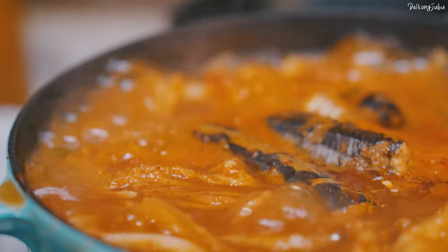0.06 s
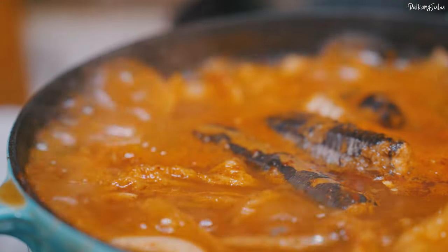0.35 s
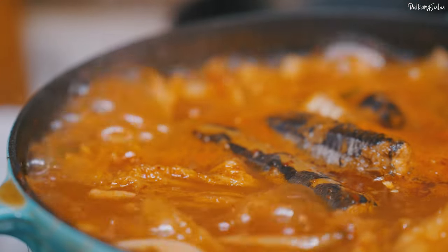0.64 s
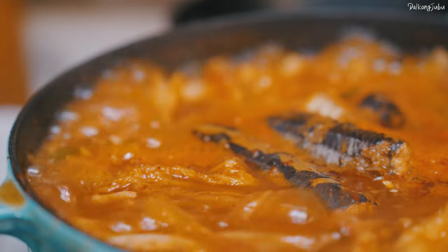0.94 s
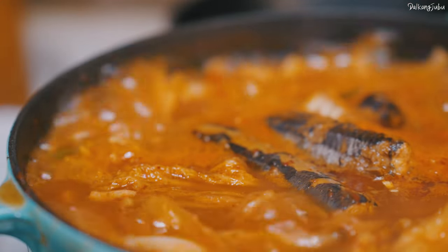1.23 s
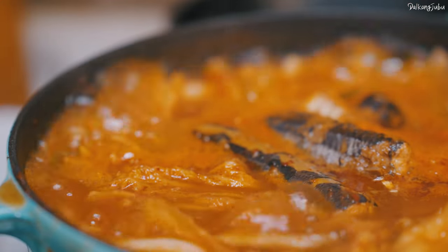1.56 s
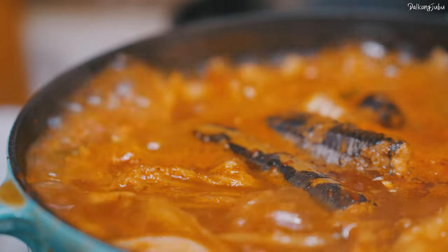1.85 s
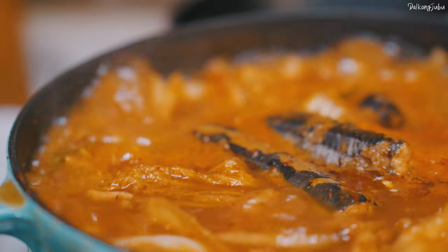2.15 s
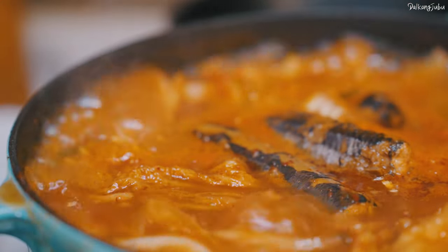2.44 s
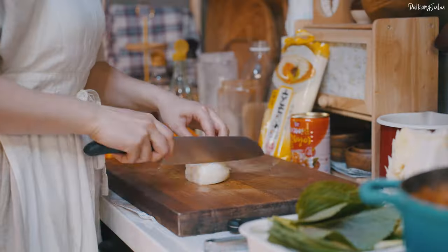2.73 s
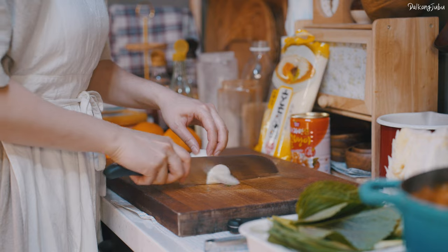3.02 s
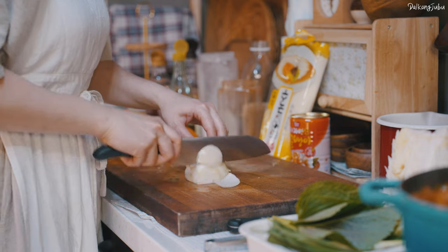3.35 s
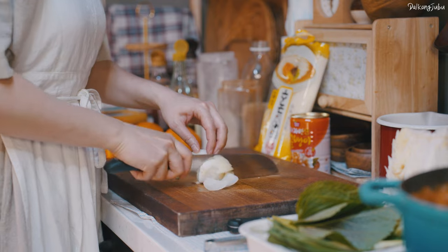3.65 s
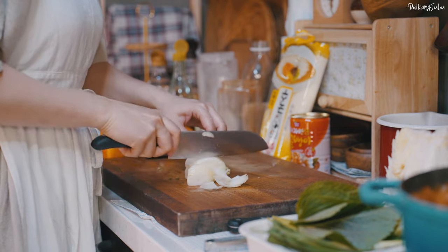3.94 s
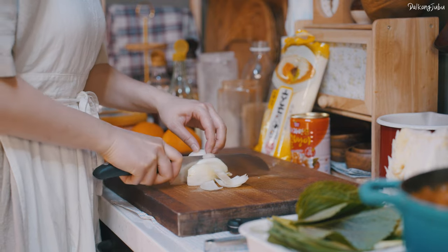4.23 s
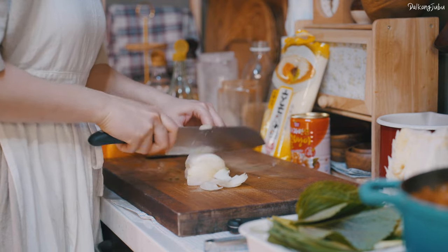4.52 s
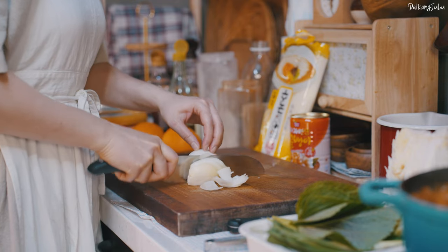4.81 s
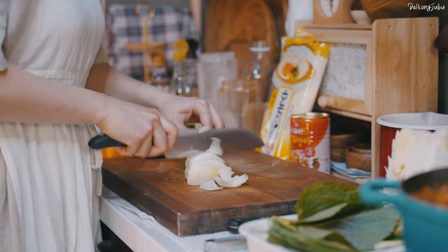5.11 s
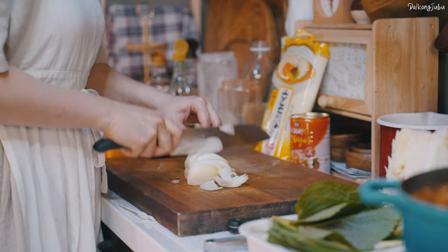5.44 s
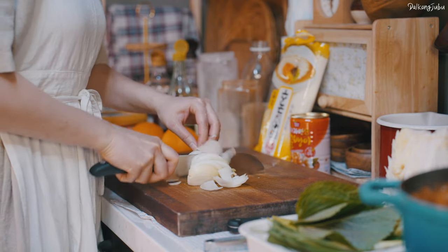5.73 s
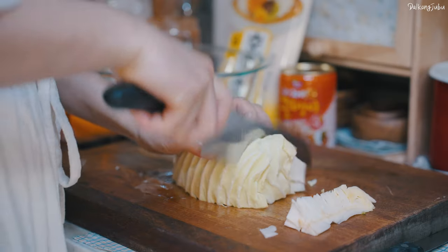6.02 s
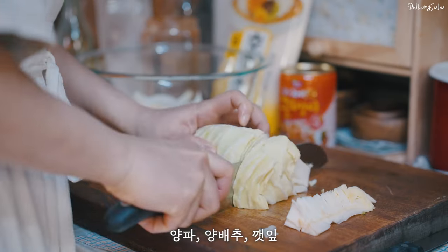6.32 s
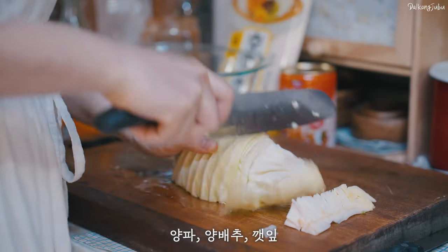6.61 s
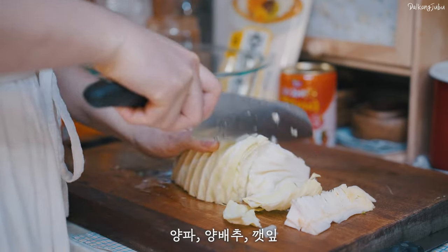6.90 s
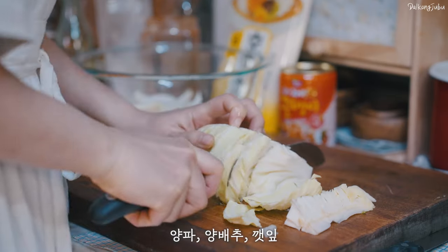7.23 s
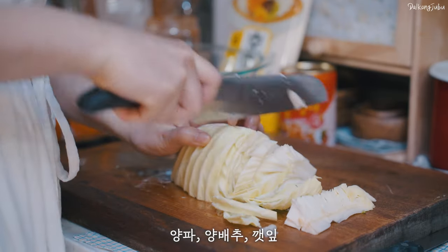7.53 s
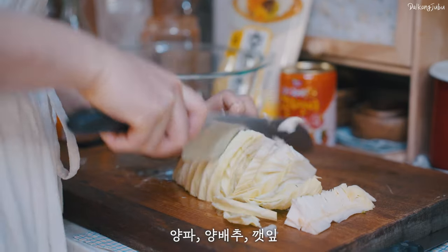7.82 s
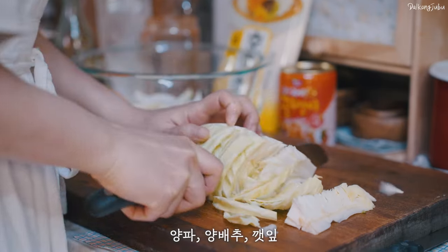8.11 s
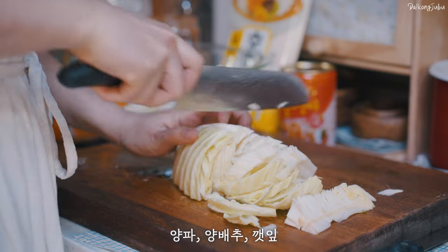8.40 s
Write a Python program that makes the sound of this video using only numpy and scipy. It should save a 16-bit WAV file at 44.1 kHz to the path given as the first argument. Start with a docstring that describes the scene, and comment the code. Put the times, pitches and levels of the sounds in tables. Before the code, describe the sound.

Heard from just above the rim, a pot of stew bubbles and plops over a fine fizz. Then the microphone is beside a cutting board in a small, quiet kitchen: six evenly paced knife strokes hiss through an onion and knock on the wood. Three slower, coarser cuts through cabbage follow, with snapping ribs and cushioned thuds, while the stew keeps simmering faintly across the counter.

```python
"""A thick stew simmers in a small kitchen, the microphone just above the rim, its bubbles bursting.
Then we are beside the cutting board, the pot faint across the counter: a knife slices an onion in six
sharp chops and crunches through a cabbage in three slower strokes. Each stroke is a swarm of bursting
cells that ends in a knock on the wooden board; shelf and walls echo it. Mono."""
import sys
import numpy as np
from scipy import signal
from scipy.fft import rfft, irfft
from scipy.io import wavfile

SR = 44100
rng = np.random.default_rng(int(sys.argv[2]) if len(sys.argv) > 2 else 0)


def wav_out(sig):
    """Save sig, one row per channel (or a flat mono array), as 16-bit PCM at SR to the path in sys.argv[1]."""
    wavfile.write(sys.argv[1], SR, np.round(np.clip(np.atleast_2d(sig).T, -1, 1) * 32767).astype(np.int16))


N = 381906
TO_BOARD_S, TO_CABBAGE_S = 2.787, 5.874  # the microphone jumps from pot to board, then to the cabbage
# The blade meets the board. Each row: time in seconds, relative level in dB, contact low-pass in Hz,
# counter thud in dB, factor on the wood's ring time, blade ring in dB.
CHOPS = [(3.0341, -14, 1870, 0.5, 0.46, -48), (3.5901, -9.5, 1580, -3.5, 0.39, -48),
         (4.2409, -12, 2300, 3, 0.54, -48), (4.752, -6.5, 2540, 3, 0.44, -48),
         (5.275, -6, 2730, 0, 0.42, -48), (5.7662, -6, 3340, 0.5, 0.4, -48),
         (6.127, -18.5, 830, 1, 0.53, -24), (7.0638, -8.5, 960, 8, 0.53, -18.5),
         (7.9533, -10, 1000, 6.5, 0.37, -19.5)]


def undb(db):
    """Decibels to gain."""
    return 10 ** (np.asarray(db) / 20)


def unit(x):
    """Scale to rms 1."""
    return x / np.sqrt(np.mean(x ** 2))


def ticks(seconds):
    """Time axis in seconds."""
    return np.arange(int(seconds * SR)) / SR


def fade(t, t60):
    """Exponential decay, 60 dB down at t60."""
    return np.exp(-np.log(1000) * t / t60)


def swell(s, rise_s, fall_s):
    """Envelope that grows to 1 at time s and dies away after it."""
    t = np.arange(N) / SR - s
    return np.exp(np.maximum(np.minimum(t / rise_s, -t / fall_s), -40))


def add(track, s, sound):
    """Mix a sound in at time s."""
    i = max(int(s * SR), 0)
    track[i:i + len(sound)] += sound[:max(N - i, 0)]


def band(x, hz, kind, order=2):
    """Butterworth filter."""
    sections = signal.butter(order, np.clip(hz, 10, SR / 2 - 10), kind, fs=SR, output="sos")
    return signal.sosfilt(sections, x)


def colour(x, points, size=4096):
    """Causal filter shaped by (Hz, dB) points that keeps the power of white noise."""
    hz, db = np.transpose(points)
    gain = undb(np.interp(np.log(np.fft.rfftfreq(size, 1 / SR) + 1), np.log(hz), db))
    cepstrum = irfft(np.log(gain))[:size // 2]
    cepstrum[1:] *= 2  # minimum phase
    response = irfft(np.exp(rfft(cepstrum, size)))
    return signal.oaconvolve(x, response / np.linalg.norm(response))[:N]


def clicks(rate, spread_db):
    """Random clicks, about `rate` a second, many small and a few large; rms 1."""
    size = undb(spread_db * np.minimum(rng.exponential(size=N), 4))
    return unit((rng.random(N) < rate / SR) * size * rng.choice([-1, 1], N))


def room_tone():
    """The low, steady hush of the kitchen."""
    # Its spectrum. Each row: frequency in Hz, relative level in dB.
    spectrum = [(15, -9), (25, 3.5), (198, -5), (359, 5), (537, -4), (762, 2), (1140, -29), (1380, -6.5),
                (4870, -24), (12200, -42), (15500, -43)]
    return undb(-61) * colour(rng.standard_normal(N), spectrum)


def room(x, wet_db, echo_db, onset_s=0.0033):
    """The direct sound, two scattered echoes and a diffuse tail whose treble dies first."""
    # Echoes off shelf and walls. Each row: delay in seconds, relative level in dB.
    echoes = [(.019, -13.5), (.047, -17.5)]
    t, echo_t = ticks(0.54), ticks(0.02)
    low, high = rng.standard_normal((2, len(t)))
    tail = band(low, 4050, "low") * fade(t, t60=0.46) + band(high, 4300, "high") * fade(t, t60=0.3)
    tail *= np.clip(t / onset_s - 1, 0, 1)
    response = undb(wet_db) * tail / np.linalg.norm(tail)
    response[0] = 1
    for s, db in echoes:
        echo = rng.standard_normal(len(echo_t)) * fade(echo_t, t60=0.016)
        add(response, s, undb(db + echo_db) * echo / np.linalg.norm(echo))
    return signal.oaconvolve(x, response)[:N]


def bubbles(events, cycles, glide):
    """Each bursting film rings its small cavity for a few cycles, rising in pitch as it opens."""
    out, t = np.zeros(N), ticks(0.024)
    for (s, db, hz), chance in zip(events, rng.standard_normal(len(events))):
        age = hz * t / (cycles * np.exp(0.27 * chance))  # 1 when the ring is 60 dB down
        phase = 2 * np.pi * hz * t * (1 + glide * np.minimum(age, 1))
        attack = 1 - np.exp(-2 * hz * t)
        add(out, s, undb(db) * np.sin(phase) * fade(age, 1) * attack)
    return out


def simmer(rate, spread_db, cycles, fizz_db, heave=1):
    """A swarm of small bubbles, 200 to 3200 Hz, over the fine crackle of the froth; rms 1."""
    # The tone of the stew. Each row: frequency in Hz, relative level in dB.
    spectrum = [(35, -20), (60, -16), (107, 3.5), (152, -8), (226, -3.5), (272, -10), (351, -6),
                (559, -0.5), (657, -8.5), (976, -1.5), (1480, -3), (3580, -20.5), (8280, -33),
                (10400, -40.5), (15500, -41)]
    when, size, pitch = rng.random((int(rate * N / SR), 3)).T
    hz = 200 * (3200 / 200) ** pitch
    db = spread_db * np.minimum(-np.log(size), 2.5) + 14 * np.log10(hz / 1000)
    swarm = bubbles(np.c_[when * N / SR, db, hz], cycles, glide=0.19)
    froth = undb(fizz_db) * clicks(2500, 2.7) + undb(6) * band(clicks(3000, 5.2), 3050, "high")
    return unit(colour(unit(swarm) * heave + froth, spectrum))


def fizzes(events, spectrum, rate, rise_s):
    """Short puffs of fine wet crackle."""
    envelope, t = np.zeros(N), ticks(0.2)
    for s, db, length in events:
        add(envelope, s, undb(db) * np.minimum(t / rise_s, 1) * np.exp(-(t / length) ** 2))
    return colour(envelope * clicks(rate, spread_db=1.1), spectrum)


def bursts(events, cycles, glide, film_db, film_t60):
    """Big bubbles: the film tears with a wet tick and the cavity rings."""
    out, t = np.zeros(N), ticks(0.02)
    for s, db, hz in events:
        tear = rng.standard_normal(len(t)) * fade(t, film_t60)
        add(out, s, undb(db + film_db) * band(tear, [hz * 0.5, hz * 1.82], "band", order=3))
    return out + bubbles(events, cycles, glide)


def close_pot(lull_s=0.013, lull_db=-4, calm_db=-3, cluster_rise_s=0.002, cluster_fall_s=0.016):
    """Just above the rim: the stew hushes as each big bubble gathers, and small ones surge after it."""
    # Big bubbles. Each row: start in seconds, relative level in dB, pitch in Hz, surge after it in dB.
    pops = [(0.158, -36, 556, -1), (0.217, -27, 1340, -7), (0.28, -35, 560, 4), (0.375, -22.5, 880, -5),
            (0.394, -29, 1575, -2), (0.484, -27.5, 1450, -5), (0.542, -29.5, 1400, -8),
            (0.568, -28, 1210, -4), (0.622, -33.5, 780, 0), (0.67, -31, 899, -1), (0.725, -33, 557, -11),
            (0.747, -27, 800, -6.5), (0.839, -40, 1010, -7), (0.919, -35, 566, 2.5), (0.977, -29, 498, -8),
            (1.005, -30, 1020, -3), (1.035, -30, 1660, -15), (1.06, -34, 500, 3), (1.249, -25, 970, 0),
            (1.332, -29, 953, 0), (1.401, -38, 1330, 1.5), (1.496, -27, 1000, 6), (1.583, -31, 880, 1),
            (1.608, -35, 1460, -3), (1.72, -34, 493, 2), (1.742, -27, 1010, 4.5), (1.769, -35, 797, -9),
            (1.823, -24, 980, -2), (1.873, -28.5, 1190, 6), (1.94, -33, 573, 2), (1.995, -30.5, 1590, -8),
            (2.037, -32, 563, 2.5), (2.157, -31, 885, -8), (2.247, -28.5, 960, 4), (2.317, -26.5, 915, -2),
            (2.381, -31, 972, -1), (2.422, -37, 571, -2), (2.46, -31, 1250, -3), (2.518, -29.5, 1200, 3),
            (2.544, -32, 494, 1), (2.587, -32, 1070, 1.5), (2.702, -32, 1030, -6), (2.749, -30, 544, 0),
            (2.774, -32, 956, -2)]
    # Drops spitting on the hot rim. Each row: start in seconds, level in dB, length in seconds.
    spits = [(.056, -34.5, 0.011), (1.122, -52, 0.023), (1.143, -53, .012), (2.075, -46.5, 0.0055)]
    spit_spectrum = [(800, -39), (2800, 5), (5000, 1.5), (9000, -15), (15000, -36)]  # Hz, dB
    lulls, clusters, t = np.zeros(N), np.zeros(N), ticks(0.1)
    for s, _, _, db in pops:
        add(lulls, s - t[-1], np.exp(-t / lull_s)[::-1])
        add(clusters, s, undb(db) * np.minimum(t / cluster_rise_s, 1) * np.exp(-t / cluster_fall_s))
    heave = undb(lull_db * lulls) * (undb(calm_db) + clusters)
    pot = undb(-47) * simmer(rate=700, spread_db=4.5, cycles=6.2, fizz_db=-0.5, heave=heave)
    big_bubbles = bursts([pop[:3] for pop in pops], cycles=8.5, glide=0.1, film_db=-0.5, film_t60=0.0066)
    pot += undb(3.5) * big_bubbles
    pot += fizzes(spits, spit_spectrum, rate=2400, rise_s=0.0032)
    return room(pot, wet_db=-14, echo_db=-9)


def far_pot():
    """The stew from across the counter: a fainter simmer with more of the room in it."""
    # Big bubbles that carry to the board. Each row: start in seconds, relative level in dB, pitch in Hz.
    pops = [(3.22, -30, 825), (3.284, -42.5, 1140), (3.978, -36, 1310), (4.003, -34, 760),
            (5.897, -29, 1940), (6.418, -30, 1460), (6.529, -43, 1690), (6.854, -34, 1510),
            (7.407, -40, 1430), (7.426, -33, 1420), (8.18, -24, 1940), (8.354, -33, 1470),
            (8.44, -34, 2460), (8.48, -29, 1530), (8.602, -30.5, 1780)]
    pot = undb(-61) * simmer(rate=290, spread_db=3.5, cycles=4.5, fizz_db=-3)
    pot += undb(6) * bursts(pops, cycles=5.4, glide=0.064, film_db=-9, film_t60=0.024)
    return room(pot, wet_db=-9, echo_db=-7)


def handling(slices_db=-71, shreds_db=-69):
    """Loose onion slices, later cabbage shreds, crackle softly as they shift under the hand."""
    # Blade and fingers brush the pieces. Each row: start in seconds, level in dB, length in seconds.
    brushes = [(2.815, -60, .03), (3.218, -57, 0.011), (3.312, -52.5, 0.015), (3.378, -59, .04),
               (3.726, -57, .008), (3.942, -61, 0.041), (4.0, -51.5, 0.031), (4.103, -52, 0.023),
               (4.127, -44, 0.026), (4.572, -54.5, 0.015), (4.618, -44, 0.021), (5.005, -56.5, 0.017),
               (5.099, -46.5, 0.021), (5.177, -47.5, 0.025), (5.615, -43, 0.016), (5.911, -47.5, 0.013),
               (6.462, -49, 0.0058), (6.503, -56, 0.011), (6.808, -59, 0.019), (7.33, -50, 0.053),
               (7.363, -48, 0.019), (7.686, -49.5, 0.014), (7.77, -54.5, 0.048), (8.168, -53.5, 0.044),
               (8.256, -49, 0.04), (8.432, -52, 0.02), (8.554, -50, 0.019), (8.643, -48, 0.039)]
    # Two spectra. Each pair: frequency in Hz, relative level in dB.
    wet_leaf = [(200, -2.5), (1200, 0.5), (3200, 0.5), (8500, -8.5), (10500, -16.5), (15500, -18)]
    loose_pieces = [(200, -2), (1500, 1), (4000, 0.5), (8500, -10.5), (15500, -22)]
    brushing = fizzes(brushes, wet_leaf, rate=1700, rise_s=0.0045)
    level = undb(np.where(np.arange(N) / SR < TO_CABBAGE_S, slices_db, shreds_db))
    shifting = colour(level * clicks(rate=900, spread_db=3.7), loose_pieces)
    return room(brushing + shifting, wet_db=-10, echo_db=0)


def landing(enters):
    """When a blade that enters at this time meets the board."""
    return min(chop[0] for chop in CHOPS if chop[0] > enters)


def onion_stroke(enters, skin_db, skin_s, flesh_db, split_db):
    """Strength of a cut: the skin gives, the hiss grows as the blade speeds up, the last layer splits."""
    speed_up_db, entry_s, release_s, split_lag_s = 14.5, 0.021, 0.0074, 0.0039
    t, lands = np.arange(N) / SR, landing(enters)
    inside = np.clip(t - enters, 0, 1)
    depth = np.minimum(inside / (lands - enters), 1)
    skin = inside / skin_s * np.exp(1 - inside / skin_s)
    release = np.exp(-np.clip(t - lands, 0, 1) / release_s)
    flesh = undb(speed_up_db * (depth - 1)) * np.minimum(inside / entry_s, 1) * release
    split = swell(lands + split_lag_s, rise_s=0.0064, fall_s=0.0064)
    return undb(skin_db) * skin + undb(flesh_db) * flesh + undb(split_db) * split


def crunch(pressure, spectrum, rate, spread_db, layer_db, layer_rate, fibre_db):
    """Cells burst under the edge, a little unevenly layer by layer; torn fibres ring at nine pitches."""
    layers = np.interp(np.arange(N) / SR * layer_rate, np.arange(N), rng.standard_normal(N))
    cells = unit(clicks(rate, spread_db) * undb(layer_db * layers))
    edges = np.exp([-0.094, 0.094])  # a narrow band round each pitch
    fibres = sum(band(clicks(rate=70, spread_db=4.2), hz * edges, "band", order=1)
                 for hz in np.geomspace(1400, 9000, 9))
    return colour(pressure * (cells + undb(fibre_db) * unit(fibres)), spectrum)


def ring(modes, t, t60_scale, phases, press_s=0.0087, rise_s=0.00078):
    """Modes that keep swinging while the edge comes down from tip to heel, then die away."""
    free = np.maximum(t - press_s, 0)
    swing = sum(undb(db) * np.sin(2 * np.pi * hz * t + phase) * fade(free, t60 * t60_scale)
                for (hz, db, t60), phase in zip(modes, phases))
    return swing * np.minimum(t / rise_s, 1)


def knocks(start, end, gain_db=-8):
    """The edge lands and the board bumps the counter; cabbage leaves soften the contact and dull it."""
    # Modes of the wooden board, the counter under it and the blade (a close pair that beats).
    # Each row: frequency in Hz, relative level in dB, t60 in seconds before ring() scales it.
    board_modes = [(491, -14.5, 0.096), (566.3, -10.5, 0.13), (639, -4.5, 0.068), (733, -3.5, 0.049),
                   (807.6, -4.5, 0.16), (866.4, -2.5, 0.02), (1022, -10.5, 0.056), (1129, -6.5, 0.1),
                   (1256, 3.5, 0.01), (1328, 0.5, 0.033), (1470, -4.5, 0.017), (1575, -11.5, 0.17),
                   (1634, -6.5, 0.029), (1774, -6.5, 0.013), (1917, -2.5, 0.017), (2053, -9, 0.035),
                   (2212, -6, 0.055), (2290, -4, 0.037), (2690, -9.5, 0.034), (2910, -12.5, 0.055),
                   (2980, -19, .03), (3390, -11, 0.018), (3775, -16, 0.025)]
    counter_modes = [(78, -41, 0.073), (113, -34, 0.1), (182, -25, 0.041), (219, -25, 0.13),
                     (257, -24.5, 0.044), (335, -24, 0.046), (415, -28.5, 0.036)]
    blade_modes = [(846, 0, .5), (868, -1, .6)]
    out, t = np.zeros(N), ticks(0.69)
    spot = rng.uniform(0, 2 * np.pi, len(board_modes))
    for s, db, contact_hz, thud_db, t60_scale, blade_db in CHOPS:
        hiss = rng.standard_normal(len(t))
        phases = spot + 0.85 * rng.standard_normal(len(spot))  # each stroke lands on a new spot nearby
        wood = ring(board_modes, t, t60_scale, phases, rise_s=0.00027)
        wood += undb(-7.5) * hiss * fade(t, t60=0.25)
        wood = band(band(wood, 410, "high", order=3), contact_hz, "low", order=3)
        steel = undb(-25) * band(hiss, [3400, 9000], "band", order=1) * fade(t, t60=0.034)
        bump = undb(-7) * band(hiss, [130, 420], "band") * fade(t, t60=0.081)
        counter = band(ring(counter_modes, t, 0.86, phases), 680, "low")
        thud = undb(thud_db) * (bump + band(counter, 59, "high", order=3))
        blade = undb(blade_db) * ring(blade_modes, t, 0.98, phases)
        if start < s < end:
            add(out, s, undb(db + gain_db) * (wood + steel + thud + blade))
    return out


def onion():
    """Onion from beside the board: a fine juicy hiss, then a hard knock."""
    # The blade enters. Each row: start in seconds, skin level in dB, seconds the skin takes to give,
    # flesh level in dB, last layer level in dB; the levels are relative.
    cuts = [(2.906, -75, 0.045, -41, -58), (3.415, -44.5, 0.0091, -42.5, -41.5),
            (4.17, -39, 0.0081, -39.5, -32.5), (4.686, -44, .02, -45, -31.5),
            (5.177, -53.5, 0.014, -43.5, -29), (5.679, -44.5, 0.023, -46, -29.5)]
    # The tone of the crunch. Each row: frequency in Hz, relative level in dB.
    spectrum = [(35, -64), (60, 9.5), (118, -1), (376, -3.5), (810, 1), (931, -4.5), (1230, -1.5),
                (1700, -5), (2710, 1.5), (3420, 0), (6500, -5.5), (8870, -9.5), (10200, -18),
                (13200, -16.5), (15500, -24.5)]
    pressure = sum(onion_stroke(*row) for row in cuts)
    cut = crunch(pressure, spectrum, rate=7000, spread_db=0.5, layer_db=1.5, layer_rate=180,
                 fibre_db=-7.5)
    board = room(knocks(TO_BOARD_S, TO_CABBAGE_S), wet_db=-10.5, echo_db=2)
    return board + room(undb(-0.5) * cut, wet_db=-6.5, echo_db=-9)


def snaps(gain_db=-5, crack_db=-9, fibre_db=6):
    """A cabbage rib breaks in a quick run of cracks that ring the piece of leaf at its own pitch."""
    # Ribs breaking. Each row: start in seconds, relative level in dB, pitch in Hz.
    ribs = [(5.9761, -25, 1460), (5.9892, -32.5, 4270), (5.996, -23.5, 1840), (6.0134, -28, 3280),
            (6.023, -20, 1760), (6.069, -19, 1560), (6.0816, -14, 1500), (6.0934, -16, 1450),
            (6.2375, -27, 2565), (6.9531, -22.5, 1520), (6.963, -18.5, 1690), (7.0435, -15, 1470),
            (7.0644, -10, 1650), (7.0854, -23, 3730), (7.1059, -15.5, 3470), (7.1282, -24, 5600),
            (7.815, -23, 1470), (7.852, -18.5, 3900), (7.86, -21, 1440), (7.8988, -18.5, 3720),
            (7.9539, -14, 1650)]
    out, t = np.zeros(N), ticks(0.04)
    for s, db, hz in ribs:
        cracks = rng.standard_normal(len(t)) * fade(t, t60=0.016)
        fibre = band(band(cracks, hz * 0.8, "high"), hz * 1.2, "low")
        broad = band(band(cracks, 790, "high"), 6300, "low")
        add(out, s, undb(db + gain_db) * (undb(crack_db) * broad + undb(fibre_db) * fibre))
    return out


def cabbage_stroke(enters, attack_s, db, split_db, release_s, draw_at, draw_db, draw_s=0.15):
    """Strength of a cut: the hand leans in until the last leaves split, then scrapes the blade back."""
    t, lands = np.arange(N) / SR, landing(enters)
    push = np.clip((t - enters) / attack_s, 0, 1) * np.exp(-np.clip(t - lands, 0, 1) / release_s)
    split = swell(lands, rise_s=0.018, fall_s=0.0023)
    draw = np.sin(np.pi * np.clip((t - draw_at) / draw_s, 0, 1))
    return undb(db) * push + undb(split_db) * split + undb(draw_db) * draw


def cabbage():
    """Cabbage from beside the board: a coarse crunch with snapping ribs, then a cushioned knock."""
    # The blade enters. Each row: start and attack in seconds, crunch and last layer levels in dB,
    # release and start of the draw back in seconds, draw level in dB; the levels are relative.
    cuts = [(6.0, 0.091, -39, -37, 0.038, 6.208, -43), (6.942, 0.075, -35, -44, 0.068, 7.09, -47),
            (7.803, 0.057, -35.5, -44, 0.033, 7.945, -44.5)]
    # The tone of the crunch. Each row: frequency in Hz, relative level in dB.
    spectrum = [(35, -44), (60, -1), (183, -5.5), (320, -16), (627, -5), (1020, -5.5), (1450, 0.5),
                (2250, -6.5), (3760, -5.5), (4850, -9.5), (8670, -13.5), (9970, -23.5), (13200, -18.5),
                (15500, -28)]
    pressure = sum(cabbage_stroke(*row) for row in cuts)
    cut = crunch(pressure, spectrum, rate=3000, spread_db=0.2, layer_db=-0.3, layer_rate=490,
                 fibre_db=-5)
    return room(undb(-2) * cut + snaps() + knocks(TO_CABBAGE_S, N / SR), wet_db=-11.5, echo_db=-2)


def scene(crossfade_s=0.0017):
    """The microphone at the pot, at the onion, then at the cabbage, over unbroken room tone."""
    t = np.arange(N) / SR
    past_pot = np.clip((t - TO_BOARD_S) / crossfade_s, 0, 1)
    past_onion = np.clip((t - TO_CABBAGE_S) / crossfade_s, 0, 1)
    at_pot = (1 - past_pot) * close_pot()
    around_board = past_pot * (far_pot() + handling())
    chopping = (1 - past_onion) * onion() + cabbage()
    return (at_pot + around_board + chopping + room_tone())[None]


def record(dry):
    """The recorder rounds off the hardest knocks and cuts the top steeply."""
    ceiling, top_hz = 0.95, 15850
    rounded = dry / (1 + (dry / ceiling) ** 4) ** (1 / 4)
    return signal.sosfilt(signal.ellip(10, 0.2, 80, top_hz, fs=SR, output="sos"), rounded)


dry = scene()
out = record(dry)
wav_out(out)
```